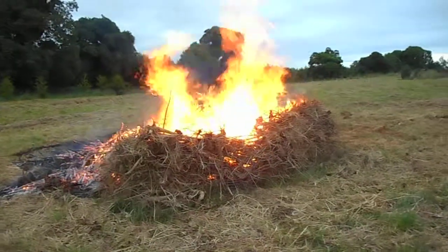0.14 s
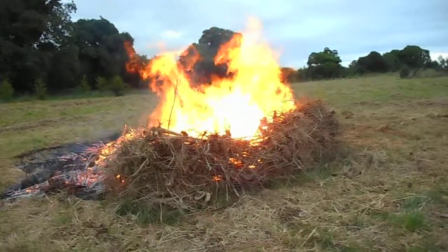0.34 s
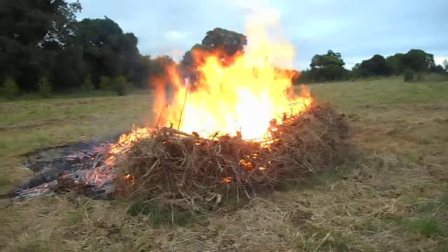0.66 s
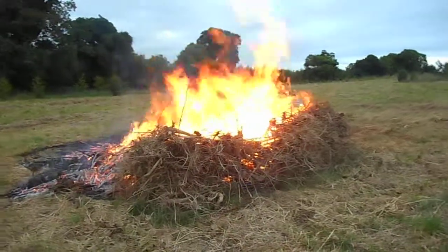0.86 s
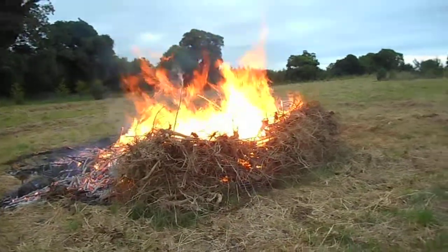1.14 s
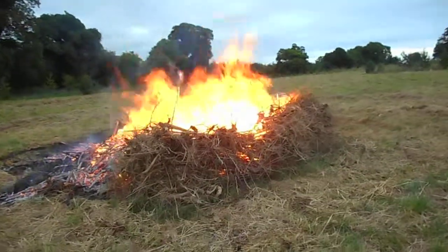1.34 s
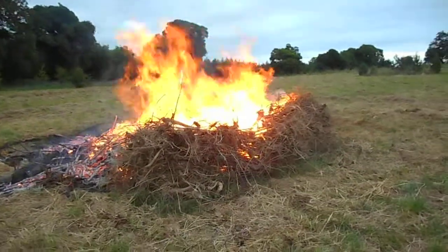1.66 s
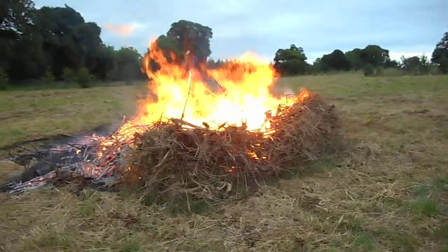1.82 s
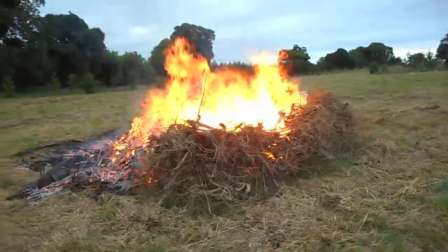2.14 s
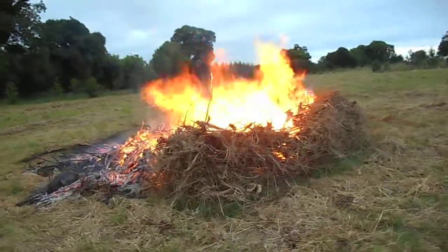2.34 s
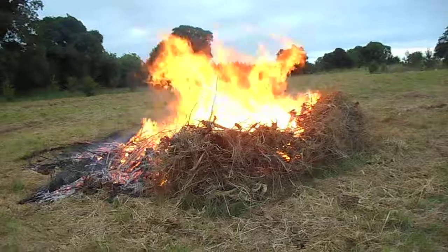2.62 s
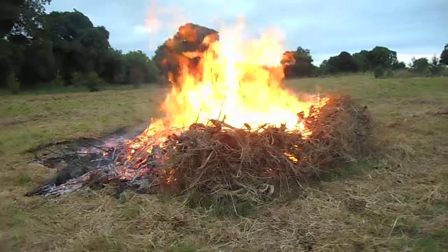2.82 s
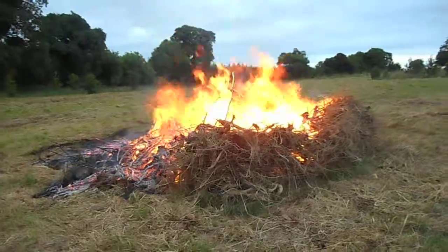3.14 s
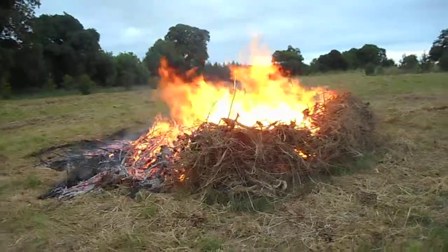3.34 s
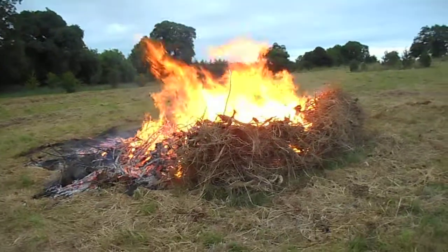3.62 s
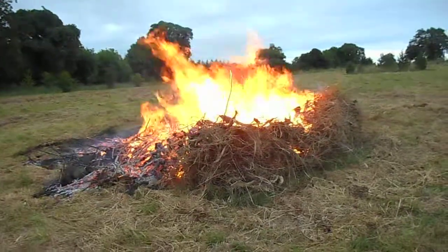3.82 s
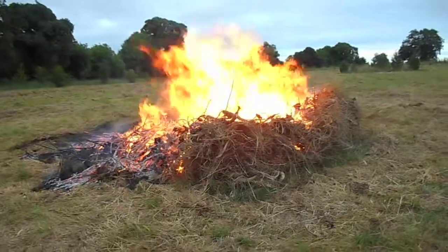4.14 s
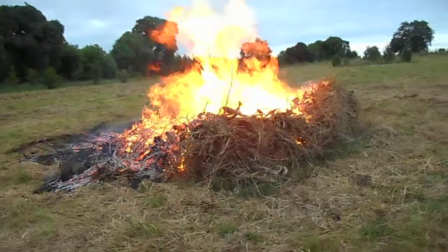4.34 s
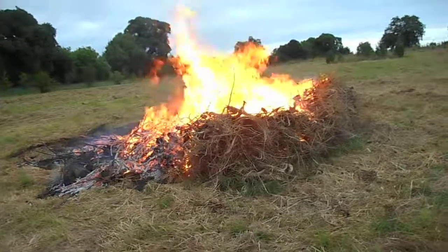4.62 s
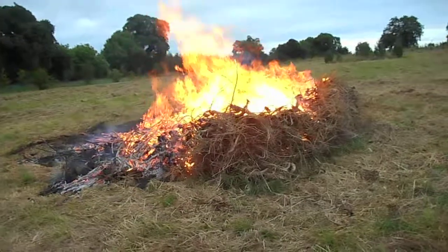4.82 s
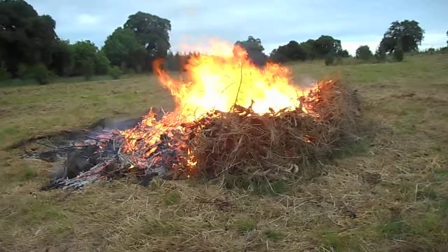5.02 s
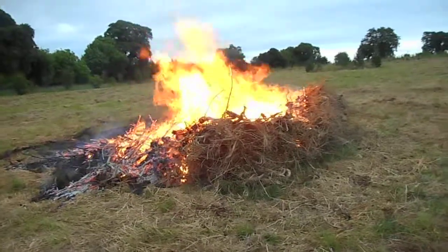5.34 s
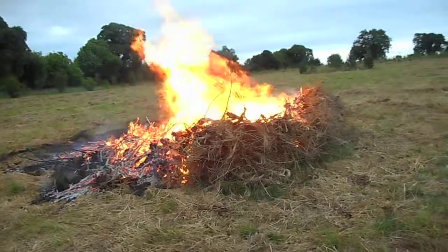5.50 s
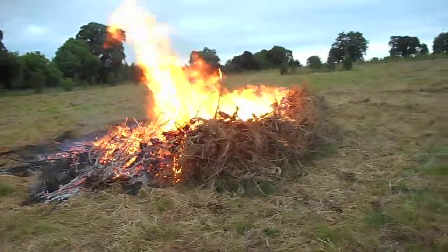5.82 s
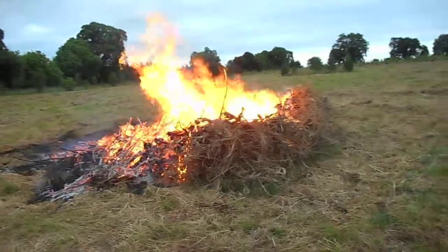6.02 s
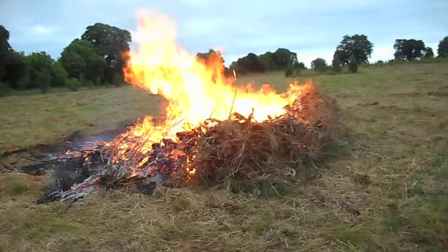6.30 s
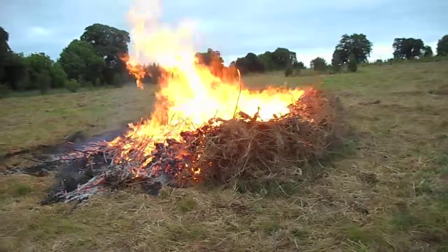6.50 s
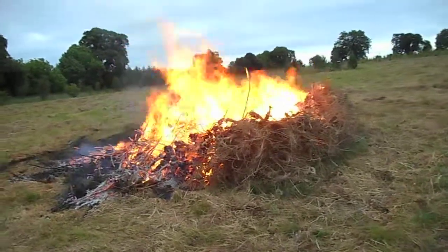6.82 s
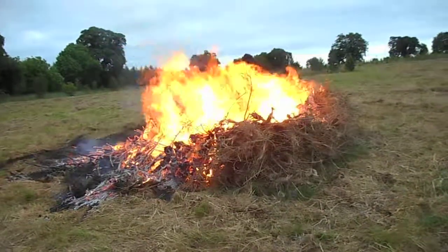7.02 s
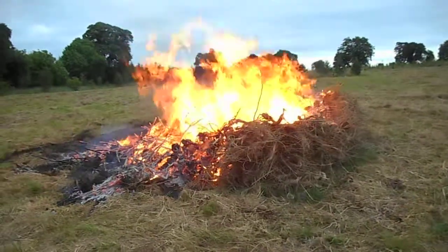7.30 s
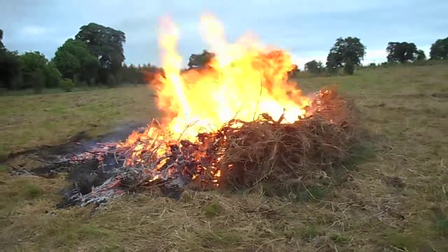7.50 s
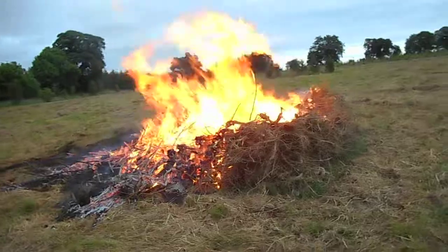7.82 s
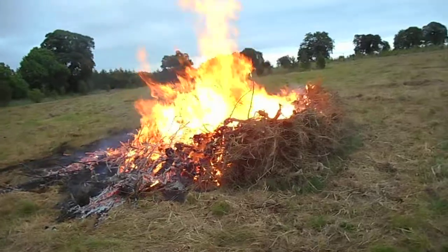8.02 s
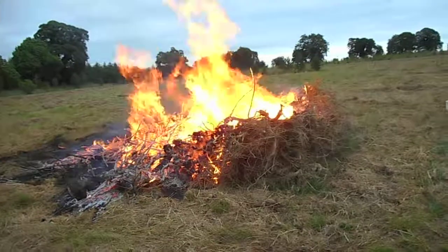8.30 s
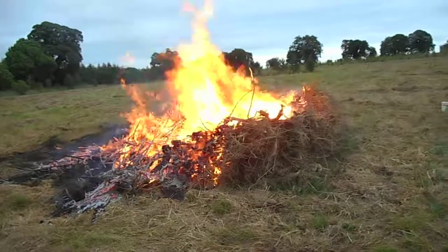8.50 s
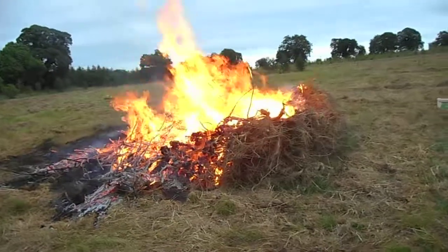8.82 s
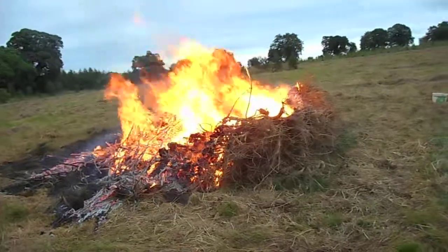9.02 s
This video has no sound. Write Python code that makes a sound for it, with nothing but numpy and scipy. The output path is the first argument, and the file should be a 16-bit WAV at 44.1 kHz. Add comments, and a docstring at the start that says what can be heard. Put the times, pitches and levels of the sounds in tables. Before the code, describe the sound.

An open brushwood bonfire crackles with sharp irregular pops and countless fine ticks over a soft gas hiss and low fluttering flame rumble outdoors.

```python
"""In an open field, a heap of brushwood burns a few metres away.
Pockets of steam burst the twigs: each pop is a sharp crack of shaped noise that rings its twig for a few ms.
Fine twigs snap and tick as short bursts; gas hisses as filtered noise and once whistles as a sinking sine.
The flames rumble and flap as low noise, and the heap and field return a faint, dull tail of the crackle."""
import sys
import numpy as np
from scipy import signal
from scipy.fft import rfft, irfft
from scipy.io import wavfile
from scipy.ndimage import uniform_filter1d, minimum_filter1d

SR = 44100
rng = np.random.default_rng(int(sys.argv[2]) if len(sys.argv) > 2 else 0)


def wav_record(signal):
    """Record a signal, one row per channel, as 16-bit PCM in the file named by sys.argv[1]."""
    frames = np.transpose(np.atleast_2d(signal))
    bounded = np.clip(frames, -1, 1)
    # unit amplitude maps onto the largest positive 16-bit level
    quanta = np.round(bounded * 32767).astype(np.int16)
    wavfile.write(sys.argv[1], SR, quanta)


N = 403515
T = np.arange(N) / SR  # seconds


def pops(ring, front=0.55, decay_share=0.62, gain_db=0.43, knock_db=-24.0, knock_hz=600, twig_q=6.1):
    """Steam splits the wood, the twig rings and its branch knocks; short pops lie more in the first crack."""
    # Pops of bursting wood. Each row: start in seconds, level in dB before gain_db (energy packed into 1 ms),
    # decay in ms before decay_share, low edge in Hz, high edge in Hz, twig resonance in Hz, its lift in dB.
    pop_rows = [(0.0389, -29.5, 2.5, 1260, 12000, 8000, -3), (0.2302, -31, 2.2, 750, 8700, 2630, 6),
                (0.2903, -25.5, 2.3, 1860, 7100, 2580, 4), (0.3102, -30, 1.4, 580, 3700, 2890, 1),
                (0.3237, -13, 2.2, 770, 3420, 1050, 6), (0.357, -28.5, 2.8, 440, 4600, 1460, 2),
                (0.5075, -9, 1.4, 950, 6100, 2020, 9.5), (0.5394, -22.5, 2.8, 1630, 7900, 5080, 5),
                (0.5567, -10.5, 1.6, 830, 6270, 2140, 12.5), (0.6465, -13.5, 1.7, 1250, 6800, 3020, 10.5),
                (0.687, -31, 1, 580, 2200, 2180, 4), (0.692, -26.5, 2.7, 580, 6000, 1070, 10),
                (0.7792, -30.5, 1.9, 4060, 6400, 5380, 6), (0.884, -25, 2.4, 1420, 12000, 5690, 4),
                (0.9409, -31.5, 1, 390, 8700, 2890, 13), (1.02, -22.5, 1.8, 660, 9700, 2470, 13.5),
                (1.031, -27, 0.54, 1430, 4600, 2890, 2), (1.043, -28.5, 1.4, 580, 9700, 1230, 10),
                (1.1443, -18.5, 1.4, 2770, 7800, 3100, 8.5), (1.245, -31, 1.2, 1260, 7000, 2730, 5),
                (1.3065, -26.5, 2.3, 1630, 5600, 5690, 6.5), (1.4765, -31, 2.5, 1860, 7100, 2290, 12),
                (1.5946, -27.5, 1.8, 2410, 7100, 5690, 8), (1.6436, -27, 0.6, 2120, 3680, 2020, 7),
                (1.8191, -13, 2.1, 2830, 8700, 3700, 7), (1.975, -27.5, 0.95, 2750, 8440, 2730, 2),
                (2.0953, -26.5, 1.4, 1100, 5600, 2150, 7), (2.1336, -27, 1.9, 970, 7900, 5300, 4),
                (2.1653, -25.5, 1, 3130, 5040, 4290, 5), (2.272, -9, 1.6, 1230, 7840, 3650, 8.5),
                (2.3842, -12.5, 2, 1300, 8700, 5380, 10), (2.4672, -29.5, 2.7, 1630, 8700, 8000, 5),
                (2.4843, -18, 0.98, 2120, 8700, 4600, 9.5), (2.5527, -24.5, 2, 660, 7100, 1170, -1),
                (2.561, -18.5, 6, 750, 3680, 1750, 4.5), (2.8, -28.5, 2.8, 1630, 12000, 3400, 3),
                (2.8728, -20, 3.1, 1630, 8750, 7450, 12), (2.949, -19, 1.9, 660, 8750, 2100, 11),
                (2.9995, -30.5, 3.5, 2120, 6400, 5380, 6), (3.0778, -5, 2.36, 840, 11500, 3100, 9),
                (3.098, -29.5, 1.3, 1100, 8700, 3830, 9), (3.245, -18.5, 1.4, 590, 12100, 2700, 7.5),
                (3.281, -28, 1.6, 440, 9700, 1380, 11), (3.2926, -28.5, 1.3, 1630, 10800, 5600, 12),
                (3.3224, -27.5, 2.6, 970, 3700, 3470, 8), (3.4358, -21, 2.7, 750, 8700, 6750, 7),
                (3.447, -27, 12, 440, 7900, 2890, 9), (3.4572, -27, 1.7, 580, 8700, 4030, 8),
                (3.606, -8.5, 2.1, 1670, 6960, 2080, 9.5), (3.6437, -29.5, 0.5, 1630, 4600, 2890, 1),
                (3.8304, -27.5, 2.7, 1260, 7900, 7560, 10), (3.8565, -23, 3.1, 850, 8700, 2760, 9.5),
                (3.905, -32, 3.4, 850, 8700, 6750, 7), (4.0262, -31, 3.5, 1860, 7900, 2430, 4),
                (4.1455, -7, 1.47, 1160, 7800, 4830, 6.5), (4.2, -24, 2.9, 1860, 12000, 2890, 3),
                (4.2153, -22.5, 0.93, 510, 12000, 720, 4.5), (4.2694, -20, 2.3, 970, 7800, 4430, 11.5),
                (4.4349, -21, 2.3, 960, 3520, 3620, 3), (4.441, -24, 3.9, 1860, 3400, 1820, 10),
                (4.459, -22.5, 3.9, 1100, 1800, 1670, 15), (4.587, -31, 1.1, 750, 4600, 2890, 2),
                (4.827, -30.5, 1.7, 1100, 7850, 2030, 9), (4.919, -23.5, 1.8, 1080, 10700, 3200, 6.5),
                (4.97, -27.5, 2.5, 660, 4600, 4540, 6), (5.142, -31, 3.3, 1260, 12000, 3030, 5),
                (5.2092, -12, 2.1, 1880, 4700, 4750, 5), (5.2959, -28, 1.8, 510, 12000, 6380, 10),
                (5.3064, -13, 5.1, 1260, 4950, 2890, 3.5), (5.3135, -22, 0.5, 850, 8700, 2500, 11),
                (5.4517, -11, 1.9, 930, 6000, 3470, 5.5), (5.5242, -21.5, 1.4, 736, 2380, 960, 7.5),
                (5.678, -32.5, 1.8, 2410, 12000, 7700, 9), (5.8992, -34.5, 0.85, 750, 5700, 3050, 1),
                (6.105, -28, 3, 970, 6400, 1830, 7), (6.1702, -12, 1.66, 750, 9400, 5300, 3),
                (6.377, -32, 0.5, 750, 5200, 1730, 6), (6.6131, -27, 0.39, 1260, 6350, 3770, 3),
                (6.8316, -32.5, 2.6, 1860, 7100, 3230, 8), (7.0354, -24, 0.86, 750, 6400, 1570, 12.5),
                (7.2527, -21.5, 5.6, 1810, 4870, 4800, 4), (7.3286, -33, 0.62, 5270, 12000, 8100, 1),
                (7.3506, -28.5, 2.2, 300, 8000, 3230, 8), (7.4066, -26, 0.9, 2120, 8700, 4800, 2),
                (7.5229, -33, 2.7, 970, 10800, 2870, 2), (7.5912, -32.5, 1.9, 1260, 9700, 2730, 2),
                (7.6722, -29.5, 0.8, 1860, 12000, 8500, 7), (7.7599, -1.5, 1.7, 1610, 3600, 2080, 8.5),
                (7.7603, -18, 1.5, 900, 3760, 1000, 11), (7.7609, -12, 0.78, 2200, 3800, 3070, 14),
                (7.79, -23, 4.9, 1860, 2470, 1970, 15), (7.886, -25.5, 2.3, 300, 6440, 3330, 8),
                (7.9376, -29, 0.5, 580, 2700, 2580, 3), (8.0588, -28.5, 1.8, 1260, 12000, 5080, 5),
                (8.103, -26, 8.1, 1860, 4570, 2260, 7), (8.175, -28.5, 2.8, 850, 7700, 2430, 3),
                (8.3504, -30.5, 1.2, 1260, 7900, 2750, 5), (8.482, -27.5, 1.6, 440, 4170, 1050, 19),
                (8.506, -28, 1.3, 970, 7900, 1040, 10), (8.5202, -19.5, 0.6, 2120, 7060, 6030, 2),
                (8.583, -21, 10, 1180, 4170, 2390, 6), (8.5905, -18, 1.9, 750, 6100, 3350, 3.5),
                (8.637, -25.5, 0.9, 580, 5600, 3400, 8), (8.6905, -24.5, 3.2, 1100, 5700, 3470, 12),
                (8.7173, -24, 2.6, 1260, 7040, 1850, 8.5), (8.783, -27, 0.55, 1260, 10800, 1630, 9),
                (8.8514, -17.5, 3.7, 850, 10700, 3820, 13.5), (8.9698, -23, 2.2, 1100, 8650, 1960, 6)]
    out = np.zeros(N)
    for s, db, decay_ms, low_hz, high_hz, twig_hz, lift_db in pop_rows:
        resonance = signal.lfilter(*signal.iirpeak(twig_hz, twig_q, fs=SR), ring)
        twig = ring + (undb(lift_db) - 1) * resonance
        crack = burst(decay_share * decay_ms, low_hz, high_hz, twig, front / decay_ms ** .5)
        add(out, s, undb(db + gain_db) * crack)

        thickness = min(knock_hz / low_hz, 1)  # thin, high twigs hardly knock
        knock = burst(decay_ms, knock_hz / 2, knock_hz, ring, front)
        add(out, s, undb(db + knock_db) * thickness * knock)
    return out


def snaps(ring, per_s=5, top_db=-33.5, range_db=3, centre_hz=2900, spread=0.43, half_band=2.16,
          decay_ms=1.1, front=.6):
    """Small twigs burst, one at a random moment of each time slot, each with its own level, pitch and length."""
    out, count = np.zeros(N), int(per_s * N / SR)
    for slot, (when, rank, pitch, length) in enumerate(rng.random((count, 4))):
        hz = centre_hz * np.exp(spread * (2 * pitch - 1))
        snap_ms = decay_ms * 2 ** (2 * length - 1)
        crack = burst(snap_ms, hz / half_band, hz * half_band, ring, front)
        add(out, (slot + when) / per_s, undb(top_db - range_db * rank) * crack)
    return out


def ticks(ring, per_s=150, top_db=-35.5, range_db=19, centre_hz=3400, spread=0.49, half_band=1.43, front=0.79):
    """Thin twigs and bark snap all over the heap: many faint ticks, few clear ones, of 128 kinds."""
    kinds = []
    for pitch, length in rng.standard_normal(size=(128, 2)):
        hz = centre_hz * np.exp(spread * np.clip(pitch, -2, 2))
        decay_ms = 1.1 * np.exp(.5 * length)
        kinds.append(burst(decay_ms, hz / half_band, hz * half_band, ring, front))

    out, count = np.zeros(N), int(per_s * N / SR)
    for k, (when, rank) in enumerate(rng.random((count, 2))):
        level_db = top_db - range_db * rank ** .5  # the root favours faint ticks
        add(out, when * N / SR, undb(level_db) * kinds[k % len(kinds)])
    return out


def hiss(body_db, treble_db, split_hz=3000, body_gain_db=-0.86, treble_gain_db=-2.0, flicker_db=0.63):
    """Gas and steam stream out of the wood as noise; body and treble waver independently."""
    # Colour of the streaming gas. Each row: frequency in Hz, relative density in dB per Hz.
    gas_colour = [(180, -46), (300, -14), (435, -5.5), (468, -5.5), (603, -1), (669, -1), (914, 1),
                  (1510, -5), (1760, -3.5), (2740, -7.5), (3280, -6.5), (3690, -6), (4350, -10),
                  (7200, -14.5), (10400, -31), (13600, -49), (22000, -120)]
    body = unit(edge(noise(gas_colour), split_hz, "low", order=4))
    jets = unit(edge(noise(gas_colour), split_hz, "high", order=4))
    body_level = undb(body_db + body_gain_db + flicker_db * walk(20))
    jet_level = undb(treble_db + treble_gain_db + flicker_db * walk(41))
    return body * body_level + jets * jet_level


def whistle(start_s=7.11, length_s=.21, fade_s=.03, start_hz=2045, sag_hz_per_s=480, level_db=-57.5,
            waver=0.0017):
    """A thin jet of steam sings from the end of a stick, wavering, and sinks as its pressure drops."""
    age = np.clip(T - start_s, 0, length_s)
    pitch = (start_hz - sag_hz_per_s * age) * (1 + waver * walk(60))
    envelope = np.minimum(np.minimum(age, length_s - age) / fade_s, 1)
    tone = np.sqrt(2) * np.sin(2 * np.pi * np.cumsum(pitch) / SR)  # rms 1
    return undb(level_db) * envelope * tone


def flames(flutter_db=1.0, flap_db=0, decay_share=0.81, half_band=1.87):
    """Turbulent burning rumbles, surging and fluttering, and flaps when a pocket of gas catches at once."""
    # Colour of the rumble. Each row: frequency in Hz, relative density in dB per Hz.
    rumble_colour = [(20, -4.5), (45, 0.5), (70, 1), (130, 1), (200, 0.5), (300, -5.5), (500, -22.5),
                     (1000, -32)]
    # Surge of the flames. Each row: time in seconds, rumble level in dB before the flutter.
    surge = [(0, -59), (0.8, -57), (1.6, -60), (1.86, -57.5), (2.1, -59), (3, -57.5), (3.85, -56.5),
             (4.25, -60.5), (4.78, -57.5), (5.05, -61), (6.2, -59.5), (6.45, -58), (6.7, -60), (7, -57),
             (7.3, -60), (7.74, -57), (9.15, -59.5)]
    # Flaps of catching gas. Each row: start in seconds, level in dB (energy packed into 1 ms),
    # decay in ms before decay_share, centre in Hz.
    flap_rows = [(1.128, -32.5, 34, 145), (1.191, -34, 15, 110), (1.87, -36.5, 12, 130),
                 (2.179, -40, 17, 230), (3.25, -35.5, 16, 42), (3.62, -35.5, 26, 140),
                 (3.701, -35, 32, 105), (3.773, -29.5, 16, 90), (4.24, -33.5, 10, 106),
                 (4.795, -36, 9.5, 145), (7.712, -23.5, 14, 200), (7.739, -21, 13, 100)]
    surge_db = np.interp(T, *np.transpose(surge))
    out = noise(rumble_colour) * undb(surge_db + flutter_db * walk(25))
    for s, db, decay_ms, hz in flap_rows:
        flap = burst(decay_share * decay_ms, hz / half_band, hz * half_band, np.ones(1), front=0)
        add(out, s, undb(db + flap_db) * flap)
    return out


def field(x, heap_db=-20, heap_s=0.0031, far_db=-33, far_s=0.034, dull_hz=5000):
    """The heap and the ground rattle on for a moment; grass and far trees return a thin, dull tail."""
    t = T[:SR // 2]
    tail = 0
    for db, decay_s in ((heap_db, heap_s), (far_db, far_s)):
        echoes = rng.standard_normal(len(t)) * np.exp(-t / decay_s)
        echoes = edge(echoes, dull_hz, "low", order=2)
        tail = tail + undb(db) * echoes / np.linalg.norm(echoes)
    return signal.fftconvolve(x, tail)[:N]


def burst(decay_ms, low_hz, high_hz, ring, front):
    """A scattered crack within its band, rung by its source, with the energy of 1 ms at rms 1."""
    x = edge(scatter(decay_ms, front), low_hz, "high", order=2)
    x = edge(x, high_hz, "low", order=3)
    x = signal.fftconvolve(x, ring)
    return x * np.sqrt(SR / 1000) / np.linalg.norm(x)


def scatter(decay_ms, front, evenness=1.0):
    """A first spike and noisy reflections that hold for a moment, then die; no broad band is much favoured."""
    size = 2 * int((3 * decay_ms + 2) * SR / 1000)
    ms = np.arange(size) * 1000 / SR
    x = np.resize(rng.standard_normal(8192), size) / np.cosh(ms / decay_ms)
    x /= np.linalg.norm(x)
    x[0] += front
    power = uniform_filter1d(np.abs(rfft(x)) ** 2, size=7)
    flattener = causal(power ** (-evenness / 2))
    return signal.fftconvolve(x, flattener)[:size]


def noise(points):
    """Noise of rms 1 with the spectrum of (Hz, dB) points."""
    return unit(signal.fftconvolve(rng.standard_normal(N), response(points, size=8192))[:N])


def response(points, size):
    """Impulse response with the spectrum of (Hz, dB) points, joined along log frequency."""
    hz, db = np.transpose(points)
    log_hz = np.log(np.fft.rfftfreq(size, 1 / SR) + 1)  # + 1 keeps 0 Hz finite
    return causal(undb(np.interp(log_hz, np.log(hz), db)))


def causal(gain):
    """Minimum-phase impulse response with these gains from 0 Hz to SR / 2."""
    cepstrum = irfft(np.log(gain + 1e-12))
    half = len(cepstrum) // 2
    cepstrum[1:half] *= 2  # fold the part before time zero onto the part after it
    cepstrum[half + 1:] = 0
    return irfft(np.exp(rfft(cepstrum)))


def walk(rate):
    """Random levels held 1 / rate s and smoothed twice; spread near 1."""
    hold = int(SR / rate)
    steps = np.repeat(rng.standard_normal(N // hold + 1), hold)
    return 2.03 * uniform_filter1d(uniform_filter1d(steps, hold), hold)[:N]


def edge(x, hz, kind, order):
    """Smooth low-pass or high-pass."""
    return signal.lfilter(*signal.butter(order, min(hz, .45 * SR), kind, fs=SR), x)


def add(out, s, x):
    """Mix x into out from time s on."""
    i = max(int(s * SR), 0)
    out[i:i + len(x)] += x[:max(N - i, 0)]


def undb(db):
    """Decibels to gain."""
    return 10 ** (np.asarray(db) / 20)


def unit(x):
    """Scale to rms 1."""
    return x / np.sqrt(np.mean(x ** 2))


def scene(swell=1):
    """Pops, snaps, ticks, hiss, whistle and flames; snaps and ticks swell with the jets of gas."""
    # Flow of gas out of the wood. Each row: time in seconds, hiss body level in dB, hiss treble level in dB,
    # both before the gains in hiss().
    gas_flow = [(0.0, -50, -53.5), (0.56, -49, -55), (0.71, -50.5, -50), (1.02, -49, -52.5),
                (1.27, -51, -55), (1.83, -51, -53.5), (2.7, -50, -53.5), (3.0, -51.5, -52.5),
                (3.47, -49.5, -55), (4.0, -50.5, -51), (4.41, -48.5, -54.5), (5.02, -51, -55),
                (6.06, -49, -54), (6.96, -51.5, -55), (7.31, -51.5, -53), (8.21, -50, -54),
                (8.64, -48, -52.5), (9.15, -48.5, -54)]
    # Ring that all cracks share. Each row: frequency in Hz, relative gain in dB.
    crack_colour = [(100, -0.5), (450, -2), (700, 2), (1050, -0.5), (1350, -2), (2000, 0.5), (2350, 0.5),
                    (3300, 2), (4500, -1.5), (6400, -4), (9000, -8), (10500, -20.5)]
    s, body, treble = np.transpose(gas_flow)
    body_db, treble_db = np.interp(T, s, body), np.interp(T, s, treble)
    ring = response(crack_colour, size=512)
    swell_db = swell * (treble_db - treble_db.mean())  # swell: dB of fine crackle per dB of jets
    fine_crackle = (ticks(ring) + snaps(ring)) * undb(swell_db)
    crackle = pops(ring) + fine_crackle
    return (crackle + field(crackle) + hiss(body_db, treble_db) + whistle() + flames())[None]


def record(dry, ceiling=.7, top_hz=10400):
    """A fast limiter holds down the loudest cracks and a steep low-pass cuts the top."""
    allowed = ceiling / np.maximum(np.abs(dry), ceiling)
    gain = uniform_filter1d(minimum_filter1d(allowed, size=25), size=25)  # sizes in samples
    low_pass = signal.ellip(8, .2, 60, top_hz, fs=SR, output="sos")
    return signal.sosfilt(low_pass, dry * gain)


dry = scene()
out = record(dry)
wav_record(out)
```